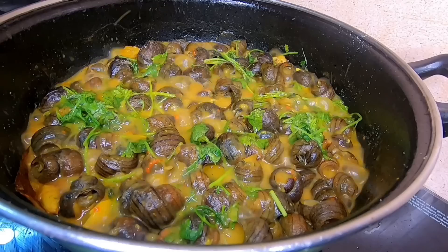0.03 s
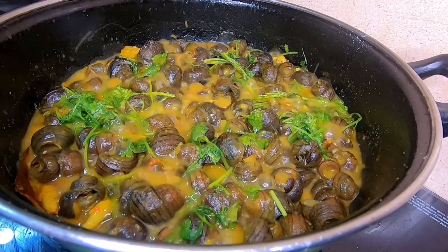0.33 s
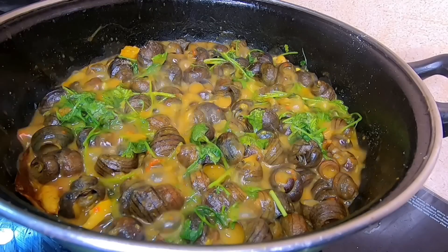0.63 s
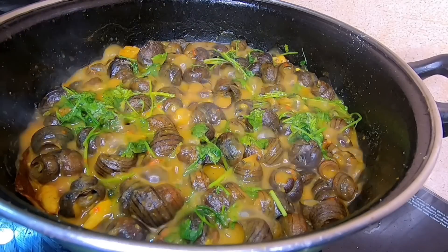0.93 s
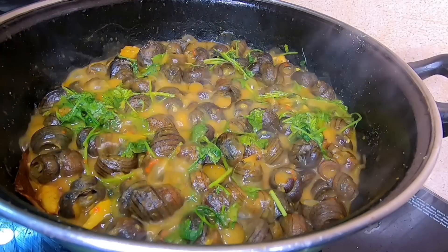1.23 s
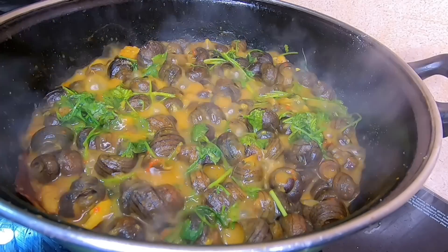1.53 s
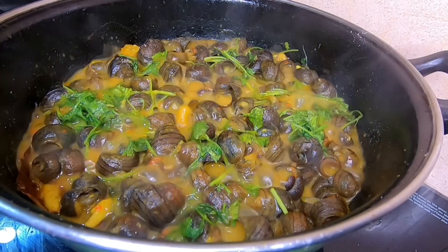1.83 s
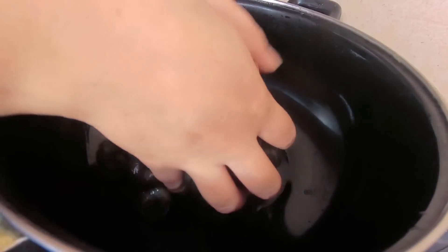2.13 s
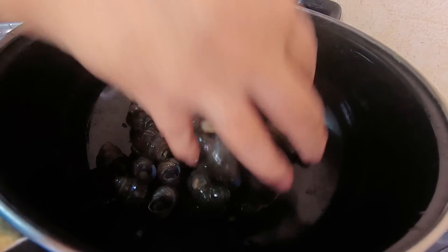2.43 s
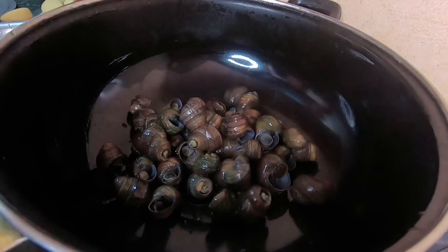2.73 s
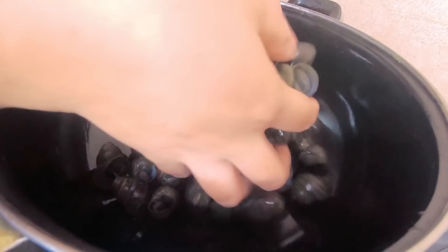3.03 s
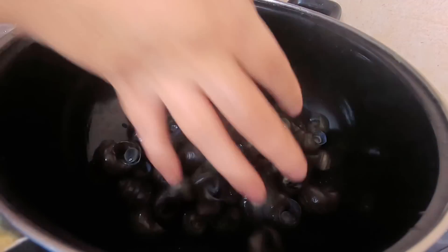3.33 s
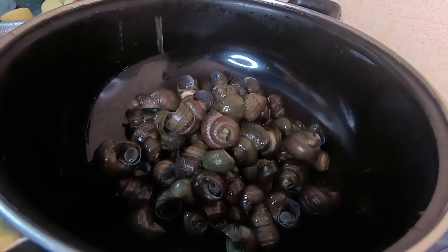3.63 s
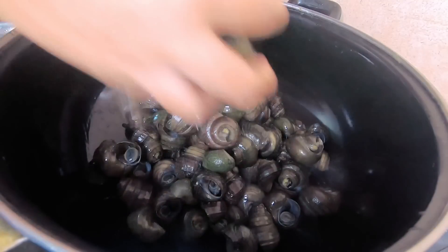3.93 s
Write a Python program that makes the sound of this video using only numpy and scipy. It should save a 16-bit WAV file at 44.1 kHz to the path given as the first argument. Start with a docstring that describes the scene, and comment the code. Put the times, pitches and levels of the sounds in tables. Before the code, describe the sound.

A simmering sauce pops and gurgles, followed by hard shells rattling and clacking in a pan.

```python
"""Curry simmers in a wide pan: small bubbles pop, larger ones gurgle through the pan's low resonances.
It fades at 2 s. Then a hand twice turns over wet snail shells in a pan: they grind, tumble in short
runs and clack against each other and the bottom, each knock ringing a shell's few modes.
Behind them are the soft hiss of a small kitchen, a low rumble of moving air and two soft bumps."""
import sys
import numpy as np
from scipy import signal
from scipy.fft import rfft, irfft, next_fast_len
from scipy.io import wavfile
from scipy.ndimage import uniform_filter1d

SR = 44100
rng = np.random.default_rng(int(sys.argv[2]) if len(sys.argv) > 2 else 0)


def transcribe(signal):
    """Save signal, clipped to [-1, 1], as a 16-bit WAV file at the path in sys.argv[1]."""
    frames = np.atleast_2d(signal).T
    limited = np.clip(frames, -1, 1)
    pcm = np.round(limited * 32767).astype(np.int16)
    wavfile.write(sys.argv[1], SR, pcm)


N = 176400
T = np.arange(N) / SR

# small-bubble spectrum: f/Hz, level/dB
BUBBLE_COLOUR = [(30, 2.5), (90, -2.5), (340, -12), (700, 0), (830, -5.5), (1080, 0.5), (1400, 0.5),
                 (2400, -7), (2850, -6.5), (3900, -14), (4750, -22), (5700, -42), (7400, -38), (8400, -36),
                 (9800, -42.5), (15000, -44.5)]
# bursts of the largest bubbles: t/s, level/dB, f/Hz
POPS = [(.359, -13.5, 1340), (.428, -9.5, 2770), (.430, -8, 3800), (0.508, -16, 1320), (.636, -12.5, 2830),
        (0.796, -15.5, 1240), (0.9664, -9.5, 1280), (1.038, -14, 3500), (1.198, -14.5, 1680),
        (1.326, -14, 1566), (1.435, -13.5, 1350), (1.519, -11.5, 3730), (1.637, -12.5, 2880),
        (1.724, -17.5, 1440)]
# sauce spits: t/s, level/dB
SPITS = [(0.323, -31), (.383, -27), (0.898, -32.5), (1.039, -36), (1.232, -32.5), (1.299, -32.5),
         (1.516, -31.5), (1.726, -24.5)]
# spit spectrum: f/Hz, level/dB
SPIT_COLOUR = [(800, -9.5), (2500, 1), (4200, 5), (5700, -15.5), (8400, -16.5), (15000, -32.5)]
POP_T60_CYCLES, POP_TOP_HZ, SPIT_DECAY_S = 22.8, 4500, .004

def bubbles():
    """Small bubbles ring briefly and crackle, the largest burst, the sauce spits."""
    fizz = grains(per_s=2400, spread_db=3.5, t60_cycles=13.2)
    crackle = from_db(-9.5) * rms_one(clicks(per_s=6000, spread_db=2.4))
    small = from_db(-30) * rms_one(colour(fizz + crackle, BUBBLE_COLOUR))
    pops, spits, t = np.zeros(N), np.zeros(N), T[:SR // 20]
    for s, db, hz in POPS:
        add(pops, s, tone(t, hz, db, POP_T60_CYCLES / hz))
    for s, db in SPITS:
        add(spits, s, from_db(db + 4) * rng.standard_normal(len(t)) * np.exp(-t / SPIT_DECAY_S))
    return small + lowpass(pops, POP_TOP_HZ, order=6) + colour(spits, SPIT_COLOUR)


# simmer envelope: t/s, level/dB
SIMMER_LEVEL = [(0.17, -65), (0.19, -21.5), (0.215, -6.5), (0.25, -0.5), (0.6, 0), (1.0, 0), (1.88, 0.5),
                (1.94, -5.5), (1.975, -21), (2.01, -30.5), (2.025, -76.5)]
# full-pan resonances: f/Hz, level/dB, t60/s
FULL_PAN_MODES = [(84.7, -44, 0.16), (139.8, -34, 0.12), (163, -34.5, 0.13), (282, -37, 0.14),
                  (401, -41.5, 0.12), (522.6, -43, 0.058), (691, -37.5, 0.067)]

def simmer():
    """Bubbles with short reflections; large ones shake the full pan into a gurgle. Mono."""
    direct = bubbles()
    gurgle = resonate(clicks(per_s=220, spread_db=2), FULL_PAN_MODES)
    wet = from_db(-4.5)
    bubbling = (direct + wet * echoes(direct, t60=0.094)) / np.hypot(1, wet)
    return level(SIMMER_LEVEL) * (bubbling + gurgle)


# shell resonances: f/pitch, level/dB, t60/s
SHELL_MODES = [(.81, -4.5, .017), (1, 1, .02), (1.13, -3, .019), (1.32, -14.5, 0.029),
               (1.932, -14.5, 0.017)]

def shell(hz):
    """One unit-energy knock; no two shells have quite the same modes."""
    knock = np.zeros(900)
    for ratio, db, t60 in SHELL_MODES:
        mode = tone(T[:900], hz * ratio * rng.normal(1, .03), db + rng.normal(0, 1), t60)
        knock += mode * rng.choice([-1, 1])
    return knock / np.linalg.norm(knock)


# steady grinding under the hand: t/s, level/dB
GRIND_LEVEL = [(2.08, -110), (2.125, -47), (2.18, -29), (2.29, -31.5), (2.37, -33), (2.43, -29),
               (2.62, -30), (2.70, -42), (2.78, -39), (2.86, -46.5), (3.05, -50), (3.09, -19.5),
               (3.19, -30.5), (3.3, -38), (3.36, -39), (3.42, -25.5), (3.58, -36.5), (3.66, -37.5),
               (3.72, -92), (4, -97)]
# runs of tumbling shells: t/s, length/s, rattle level/dB, pan level/dB
TUMBLES = [(2.176, 0.057, -25.5, -34.5), (2.228, 0.02, -21.5, -29.5), (2.396, .012, -28, -32.5),
           (2.459, 0.023, -24, -26.5), (2.525, 0.006, -20, -39.5), (2.545, 0.026, -21.5, -26),
           (2.583, 0.036, -32.5, -61), (3.09, 0.034, -30, -36.5), (3.147, 0.0067, -24, -55),
           (3.204, .026, -21.5, -29), (3.245, 0.059, -22.5, -33.5), (3.45, 0.043, -27.5, -54),
           (3.511, 0.05, -26, -37.5)]
# bare-contact spectrum: f/Hz, level/dB
SCRAPE_COLOUR = [(60, -17.5), (130, -18.5), (420, -20), (620, -7), (1400, -4.5), (2300, -3), (3000, -1.5),
                 (4700, 2), (6000, -5), (8000, -9), (10000, -15), (11500, -24), (15000, -36.5)]
# resonances of the almost empty pan: f/Hz, level/dB, t60/s
PAN_MODES = [(135, -20, 0.032), (304, -29.5, 0.21), (643, -6, 0.058), (725, -7, 0.044), (1060, -4, 0.032),
             (1140, -9, 0.027), (1867, -10.5, 0.045), (2440, -8.5, 0.068)]
TUMBLE_ATTACK_S, TUMBLE_RELEASE_S, GRIND_PAN_DB = 0.0012, 0.0047, -13.5
SHELL_HZ, SHELL_SPREAD_OCTAVES = 3823, .3

def stirring():
    """Shells of many sizes knock, scrape and drum on the pan, swelling with each tumble."""
    rattle_power = level(GRIND_LEVEL) ** 2
    pan_power = rattle_power * from_db(GRIND_PAN_DB) ** 2
    for s, length, rattle_db, pan_db in TUMBLES:
        attack = np.clip((T - s) / TUMBLE_ATTACK_S + .5, 0, 1)
        run = attack * np.exp(-np.maximum(T - s - length, 0) / TUMBLE_RELEASE_S)
        rattle_power += (from_db(rattle_db) * run) ** 2
        pan_power += (from_db(pan_db) * run) ** 2
    contacts = steadied(clicks(per_s=600, spread_db=3.5))
    grit = steadied(grains(per_s=4200, spread_db=3.2, t60_cycles=17)) + from_db(-3) * contacts
    scrape = rms_one(colour(grit * np.sqrt(rattle_power), SCRAPE_COLOUR)) * np.sqrt(rattle_power.mean())
    pan = resonate(contacts * np.sqrt(pan_power), PAN_MODES) * np.sqrt(pan_power.mean())
    octaves = SHELL_SPREAD_OCTAVES * np.clip(rng.standard_normal(150), -2, 2)
    heap = [shell(hz) for hz in SHELL_HZ * 2 ** octaves]
    struck, knocks = rng.integers(0, len(heap), N), np.zeros(N)
    for i in np.flatnonzero(contacts):
        add(knocks, T[i], contacts[i] * np.sqrt(rattle_power[i]) * heap[struck[i]])
    return from_db(-4) * knocks + from_db(-3.5) * scrape + pan


# hard clacks: t/s, level/dB, f/Hz, crunch re ring/dB
CLACKS = [(2.169, -34, 3370, 1), (2.185, -26.5, 4000, 16), (2.3212, -23.5, 4210, -9),
          (2.338, -19.5, 4500, -30), (2.4005, -26.5, 3380, 5), (2.4603, -27, 3060, 5),
          (2.527, -20.5, 3400, 14), (2.608, -21, 3980, -25), (2.6514, -20.5, 4170, -8),
          (2.6912, -32.5, 2570, -20), (2.823, -22.5, 4430, -5.5), (2.8938, -37, 3820, -8),
          (3.011, -31, 4240, 27), (3.064, -21, 5440, 9), (3.0875, -26, 2830, -1), (3.119, -17.5, 3800, 10),
          (3.1553, -18.5, 3460, 1), (3.211, -23.5, 2880, 0), (3.278, -31, 4500, 18),
          (3.309, -26, 3760, -13), (3.324, -22.5, 4200, -13), (3.331, -21, 4610, 3),
          (3.4467, -19.5, 3400, 4), (3.457, -22, 3950, -3), (3.523, -23.5, 3570, 1),
          (3.545, -25.5, 4500, -29), (3.5682, -24, 3920, -15), (3.601, -21, 2900, 3),
          (3.608, -22.5, 4260, -23), (3.6574, -25, 4440, -8), (3.67, -29.5, 2820, -9),
          (3.9765, -33.5, 3760, 2)]
# crunch spectrum: f/Hz, level/dB
CRUNCH_COLOUR = [(100, -17.5), (420, -22), (620, -5.5), (2200, -2), (3300, 3), (5000, 2.5), (8500, -1),
                 (10500, -7), (12000, -17.5), (15000, -17)]
# pan-wall resonances: f/Hz, level/dB, t60/s
PING_MODES = [(4100, -18, 0.1), (4520, -35, .04), (5400, -25.5, 0.13), (6460, -26, 0.066),
              (7600, -30.5, 0.16), (8300, -31, 0.14)]
CRUNCH_DECAY_S, BOUNCE_S, BOUNCE_DB, PING_AT_S = 0.00092, 0.0046, -8, 2.3385

def clacks():
    """Each falling shell crunches briefly, rings and bounces once; one pings the pan's wall."""
    rings, crunches = np.zeros(N), np.zeros(N)
    for s, db, hz, crunch_db in CLACKS:
        strength = from_db(db) * np.sqrt(SR / 100) / np.hypot(1, from_db(crunch_db))  # level over 10 ms
        knock = shell(hz)
        bounce_s = BOUNCE_S * rng.uniform(.5, 1.5)
        for delay, gain in ((0, strength), (bounce_s, strength * from_db(BOUNCE_DB))):
            crunch = rng.standard_normal(400) * np.exp(-T[:400] / CRUNCH_DECAY_S)
            add(rings, s + delay, gain * knock)
            add(crunches, s + delay, gain * from_db(crunch_db) * crunch / np.linalg.norm(crunch))
    add(rings, PING_AT_S, sum(tone(T[:SR // 8], *mode) for mode in PING_MODES))
    return rings + colour(crunches, CRUNCH_COLOUR)


# pan-wall reflections: delay/s
WALL_DELAYS_S = [.00023, .00051, .00094]
WIDTH, PLACES_PER_S, ROOM_T60_S, ROOM_DB = 0.86, 150, 0.26, -10

def in_pan(x):
    """The pan's wall scatters each contact, left or right; the kitchen reverberates."""
    x = lowpass(x, hz=11300, order=3)
    place = rms_one(np.interp(T * PLACES_PER_S, np.arange(1000), rng.uniform(-1, 1, 1000)))
    room_send = from_db(ROOM_DB) * lowpass(x, hz=6000, order=1)
    side = WIDTH * place * scatter(x, WALL_DELAYS_S[1:]) + echoes(room_send, ROOM_T60_S)
    mid = scatter(x, WALL_DELAYS_S) + echoes(room_send, ROOM_T60_S)
    return stereo(mid, side) * from_db([[.3], [-.3]])


# hiss envelope: t/s, level/dB
HISS_LEVEL = [(2.08, -86.5), (2.18, -49), (2.7, -48), (3.0, -45), (3.3, -38.5), (3.75, -40), (4, -38.5)]
# hiss spectrum: f/Hz, level/dB
HISS_COLOUR = [(30, -28), (90, 2), (140, 7.5), (220, -6.5), (290, 5.5), (370, -7), (650, 5.5), (850, -1),
               (1100, 4.5), (1600, -1.5), (3200, 2), (5500, -6), (9000, -8), (12000, -16.5), (15000, -29.5)]

def kitchen_hiss():
    """Soft room noise that enters with the shells and grows."""
    mid, side = rms_one(colour(rng.standard_normal((2, N)), HISS_COLOUR))
    return level(HISS_LEVEL) * stereo(mid, from_db(-1) * side)


# rumble envelope: t/s, level/dB
RUMBLE_LEVEL = [(2.1, -82), (2.2, -49), (2.6, -48), (3.04, -67), (3.12, -36.5), (3.35, -36), (3.5, -46),
                (4, -73)]
RUMBLE_LOW_HZ, RUMBLE_HIGH_HZ = 59, 113

def rumble():
    """Air moved by the hand close by, different left and right."""
    band = signal.butter(2, [RUMBLE_LOW_HZ, RUMBLE_HIGH_HZ], "band", fs=SR, output="sos")
    mid, side = rms_one(signal.sosfilt(band, rng.standard_normal((2, N))))
    return level(RUMBLE_LEVEL) * (from_db(-10) * mid + side * np.array([[1], [-1]]))


# low bumps: t/s, f/Hz, level/dB
THUDS = [(2.935, 174, -40.5), (3.99, 179.5, -39.5)]
THUD_HALF_WIDTH_S = 0.023

def thuds():
    """Soft bumps in the pauses: low sines under bell-shaped envelopes."""
    return sum(from_db(db) * np.exp(-((T - s) / THUD_HALF_WIDTH_S) ** 2) * np.sin(2 * np.pi * hz * T)
               for s, hz, db in THUDS)


# side-channel response: f/Hz, level/dB
SIDE_COLOUR = [(60, 1), (250, -15), (600, -4.5), (3000, -7), (4500, -9), (7000, 0.5), (14000, 2.5)]

def stereo(mid, side):
    """Low mids stay central, treble spreads."""
    return mid + colour(side, SIDE_COLOUR) * np.array([[1], [-1]])


def echoes(x, t60):
    """Dense decaying reflections at the power of the source."""
    t = T[:SR // 2]
    tail = rng.standard_normal(len(t)) * from_db(-60 * t / t60) * (t > .0005)
    return signal.fftconvolve(x, tail / np.linalg.norm(tail))[:N]


def scatter(x, delays_s, echo_gain=0.53):
    """All-pass echoes smear each click without colouring it."""
    for delay in delays_s:
        taps = np.r_[1, np.zeros(int(delay * SR)), echo_gain]
        x = signal.lfilter(taps[::-1], taps, x)
    return x


def clicks(per_s, spread_db):
    """Random clicks, many weak, a few strong."""
    sizes = from_db(spread_db * np.minimum(rng.exponential(1, N), 4.5))
    return sizes * rng.choice([-1, 1], N) * (rng.random(N) < per_s / SR)


def grains(per_s, spread_db, t60_cycles):
    """Short rings at random pitches, even over the spectrum."""
    births, pitches_hz = clicks(per_s, spread_db), np.geomspace(450, 13000, 36)
    pitch_index = rng.integers(0, len(pitches_hz), N)
    return rms_one(sum(np.sqrt(hz) * rms_one(ring(births * (pitch_index == k), hz, t60_cycles / hz))
                       for k, hz in enumerate(pitches_hz)))


def resonate(hits, modes):
    """Each hit drives each mode by a random amount; a second, shorter ring softens the attack."""
    out = np.zeros(N)
    for hz, db, t60 in modes:
        ringing = ring(hits * rng.normal(1, 1, N), hz, t60)
        out += from_db(db) * rms_one(ring(ringing, hz, t60 / 5))
    return out


def ring(x, hz, t60):
    """Two-pole resonator: a click starts a damped tone."""
    r, w = from_db(-60 / (t60 * SR)), 2 * np.pi * hz / SR
    return signal.lfilter([.5, 0, -.5], [1, -2 * r * np.cos(w), r * r], x + 1e-18)


def tone(t, hz, db, t60):
    """Decaying sine."""
    return from_db(db - 60 * t / t60) * np.sin(2 * np.pi * hz * t)


def colour(x, points):
    """Minimum-phase filter through (f/Hz, level/dB) points."""
    size = next_fast_len(N + SR // 4, True) // 2 * 2
    hz, db = np.transpose(points)
    bins_hz = np.arange(size // 2 + 1) * SR / size
    gain = from_db(np.interp(np.log(bins_hz + 1), np.log(hz), db))
    cepstrum = irfft(np.log(gain))
    cepstrum[1:size // 2] *= 2  # fold onto positive time
    cepstrum[size // 2 + 1:] = 0
    return irfft(rfft(x, size) * np.exp(rfft(cepstrum)))[..., :N]


def lowpass(x, hz, order):
    """Maximally flat low-pass."""
    return signal.sosfilt(signal.butter(order, hz, fs=SR, output="sos"), x)


def steadied(x):
    """Even out the power over 20 ms."""
    return x / np.sqrt(uniform_filter1d(x ** 2, size=900) + 1e-6)


def level(points):
    """Gain envelope from (t/s, level/dB) points."""
    return from_db(np.interp(T, *np.transpose(points)))


def from_db(db):
    """Decibels to gain."""
    return 10 ** (np.asarray(db) / 20)


def rms_one(x):
    """Scale to unit power."""
    return x / np.sqrt(np.mean(x ** 2) + 1e-20)


def add(out, s, sound):
    """Mix a short sound in at time s."""
    i = int(s * SR)
    out[i:i + len(sound)] += sound[:N - i]


def scene():
    """The simmer, then the shells over the kitchen background."""
    return simmer() + in_pan(stirring() + clacks()) + kitchen_hiss() + rumble() + thuds()


def record(dry):
    """Rounded peaks, steep treble cut."""
    rounded = .9 * np.tanh(dry / .9)
    stop_db, stop_hz = 70, 16400
    return signal.sosfilt(signal.cheby2(14, stop_db, stop_hz, fs=SR, output="sos"), rounded)


dry = scene()
out = record(dry)
transcribe(out)
```